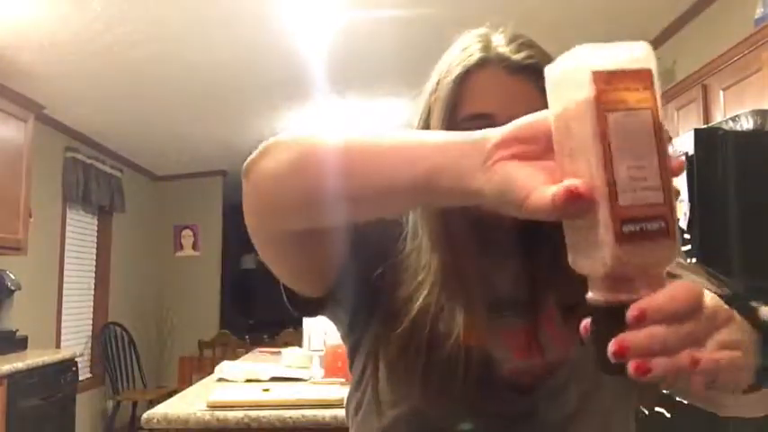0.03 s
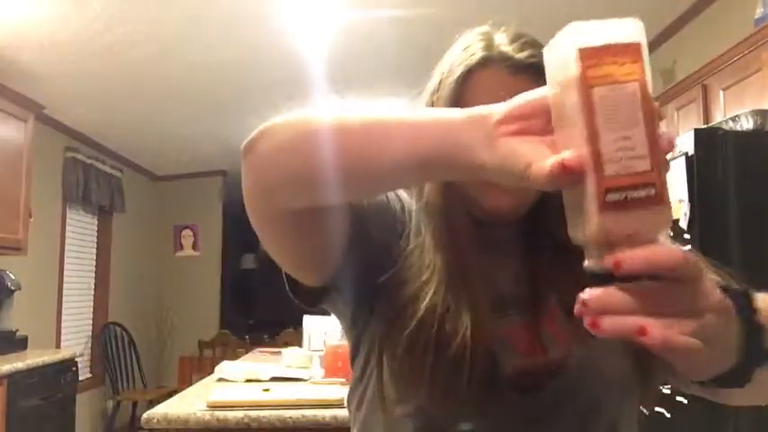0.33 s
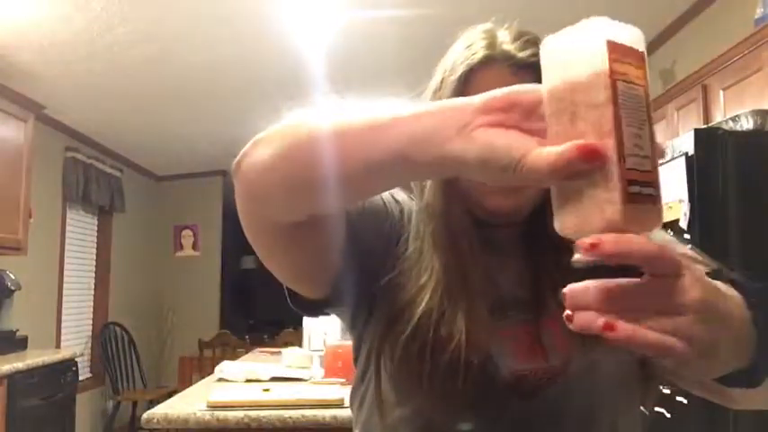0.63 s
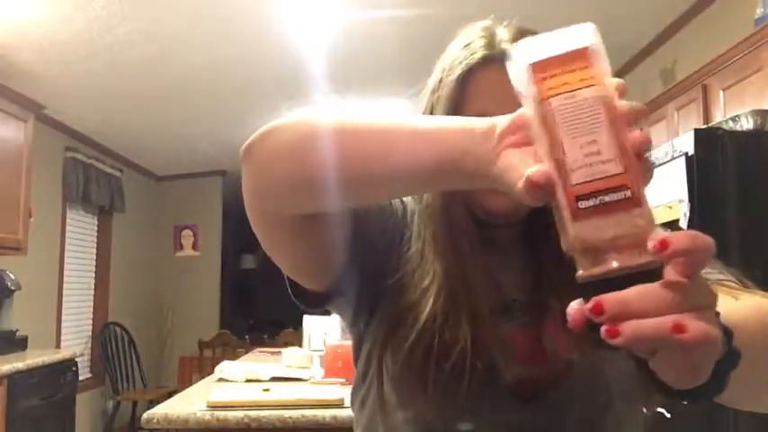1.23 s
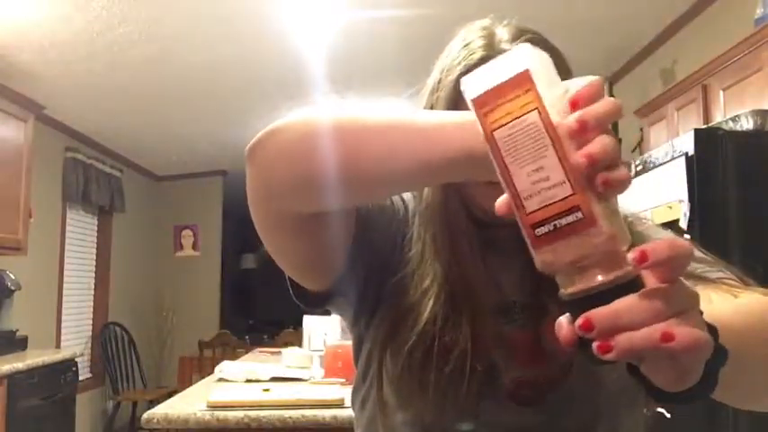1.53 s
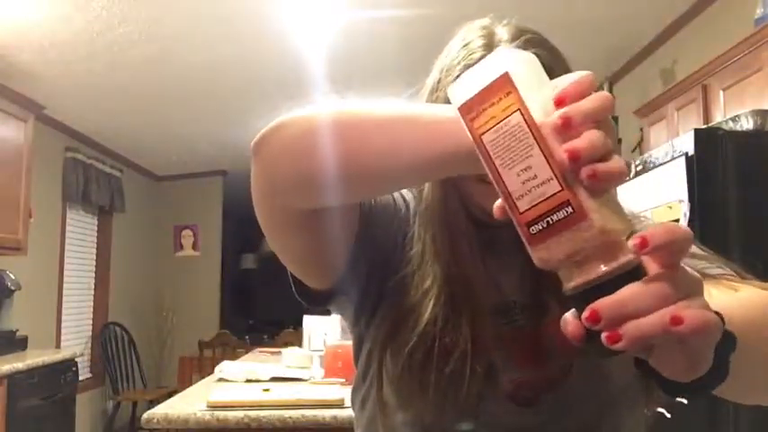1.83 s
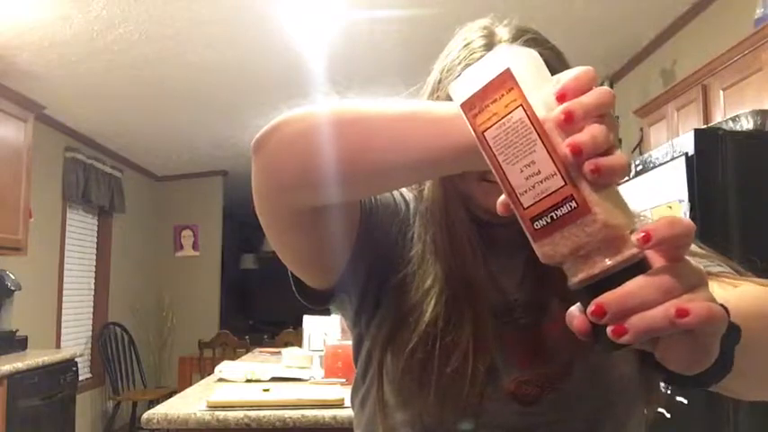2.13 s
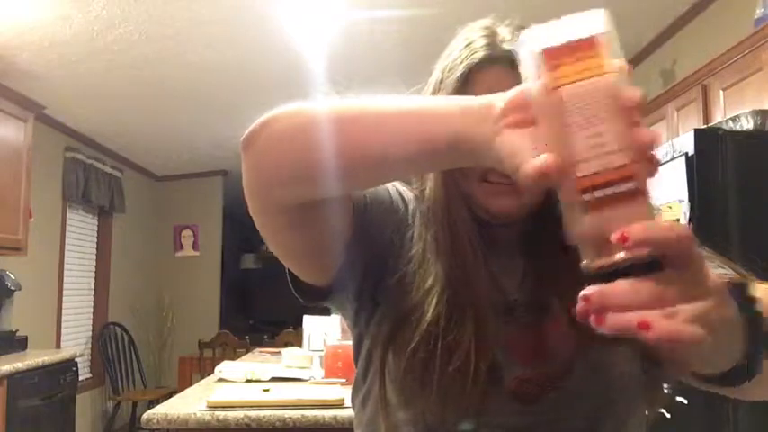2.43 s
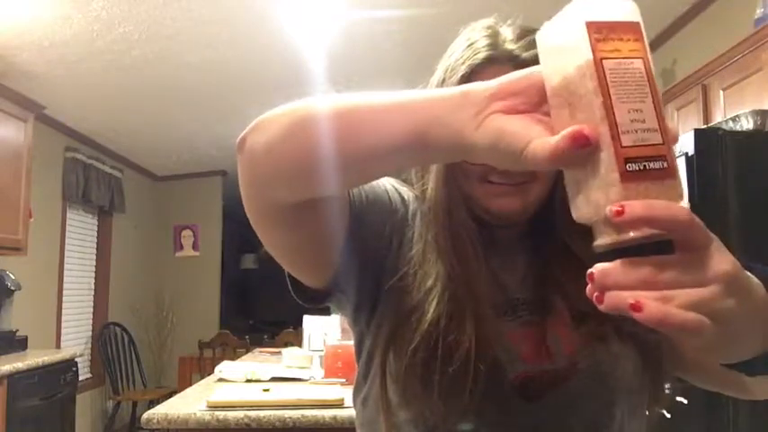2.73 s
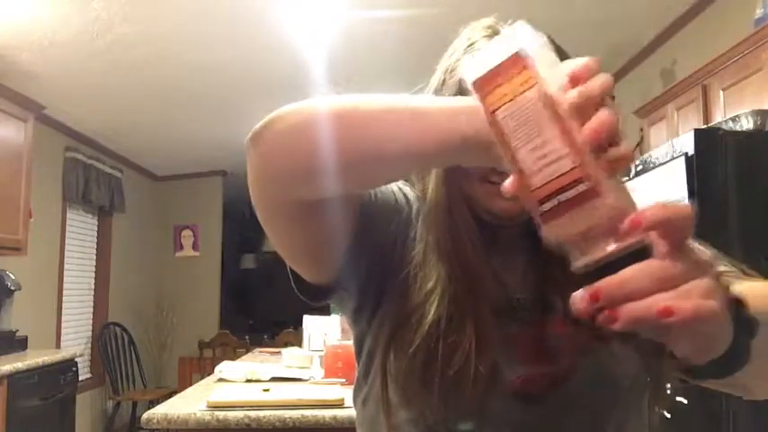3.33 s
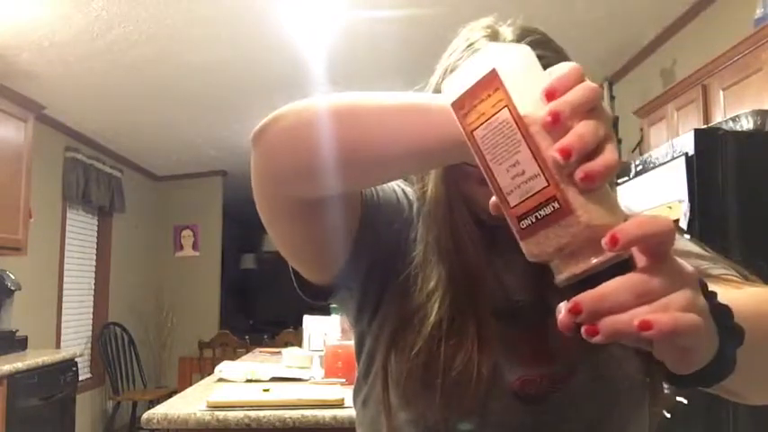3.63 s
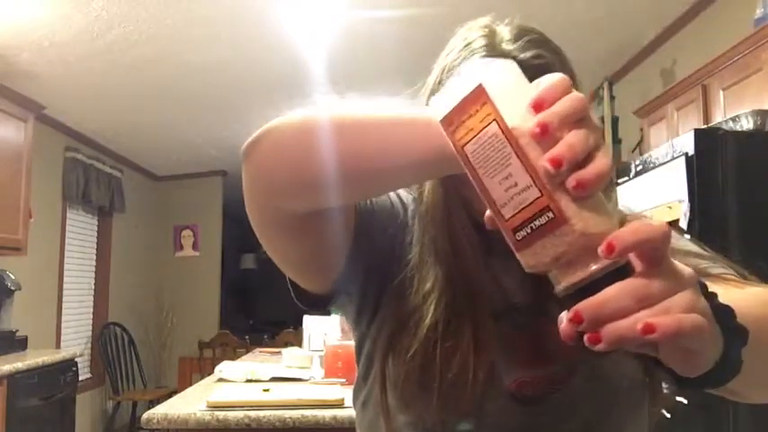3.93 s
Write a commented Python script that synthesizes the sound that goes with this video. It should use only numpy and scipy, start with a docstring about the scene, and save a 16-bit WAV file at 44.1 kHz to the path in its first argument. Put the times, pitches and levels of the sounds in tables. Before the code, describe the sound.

Coarse salt slides and knocks inside a plastic jar jerked by hand. Faint ticks lead to a few short rattles, a lull, then the loudest burst near the end. It sounds close, in a quiet kitchen with a humming refrigerator.

```python
"""Coarse salt surges and knocks in a plastic jar held upside down, gripped and jerked in a quiet kitchen.
Impacts of the salt excite the jar's damped modes; sliding, scraping and trickling are showers of tiny
random collisions. Hard lumps clack, stray crystals ping, the stressed plastic ticks under the fingers
and the palms bump it softly. Near surfaces echo, the room reverberates and a refrigerator hums behind."""
import sys
import numpy as np
from scipy import signal
from scipy.fft import rfft, irfft
from scipy.io import wavfile

SR = 44100
rng = np.random.default_rng(int(sys.argv[2]) if len(sys.argv) > 2 else 0)


def wrap_up_sound(samples):
    """Save the sound to the file named by the first command line argument, as 16-bit audio."""
    columns = np.atleast_2d(samples).T
    # keep every value between -1 and 1, then stretch to whole-number steps
    tamed = np.clip(columns, -1, 1)
    steps = np.round(tamed * 32767).astype(np.int16)
    wavfile.write(sys.argv[1], SR, steps)


N = 176400
T = np.arange(N) / SR
HIT_T = T[:SR // 8]  # time axis of one short event
IMPULSE = 1. * (HIT_T == 0)


def knocks():
    """Impact excitation: the mass of salt hits the wall, giving a crack and the jar's hollow ring."""
    # Impacts. Each row: start in seconds, level in dB, tilt in dB per octave, ring gain in dB.
    impacts = [(0.262, -64, -1, -8), (1.0752, -36.5, 1.5, -5), (1.0763, -42, -6, 6), (1.0925, -55, 2, -12),
               (1.2945, -41, 0.5, -9), (1.2985, -45, 4, -19), (1.3055, -33, 3, -5), (1.4562, -53, -0.5, 9),
               (2.4632, -40, 2, -7), (2.603, -43, 0.5, -6), (3.2995, -31.5, 4.5, -4),
               (3.3188, -32, -1.5, -7), (3.3294, -35, -1.5, -6), (3.3443, -55, 4, -11),
               (3.3548, -31, 0, -2.5), (3.3602, -40.5, 4, 1.5), (3.4324, -22, 0, -2.5),
               (3.4354, -30, 3, -8)]
    # Spectrum of the crack. Each row: frequency in Hz, relative level in dB.
    crack_spectrum = [(50, -36), (130, 3), (260, 1.5), (380, -13), (600, 10), (2000, 3), (5000, -2),
                      (8500, -12), (11000, -19), (16000, -17)]
    out = np.zeros(N)
    for start, db, tilt_db, ring_db in impacts:
        crack = unit_attack(colour(snap(decay_s=.004, edge=7.4), crack_spectrum, tilt_db))
        body = unit_attack(jar(IMPULSE, tilt_db, scatter_db=1.5))
        add(out, start, from_db(db) * (from_db(-2.5) * crack + from_db(ring_db) * body))
    return out


def slides():
    """Granular friction: salt surges along the wall in a shower of collisions that also rings the jar."""
    # Surges. Each row: start in seconds, length in seconds, level in dB, tilt in dB per octave.
    surges = [(0.286, 0.054, -57, -0.5), (0.363, .05, -61, 1.5), (0.416, .04, -56.5, 1),
              (0.465, 0.078, -51.5, 0), (0.766, 0.014, -52.5, 2), (0.877, 0.075, -64, 8),
              (1.063, 0.05, -41, 2), (1.117, 0.021, -51, -1), (1.293, 0.036, -43, 0),
              (1.445, 0.04, -48.5, 1.5), (1.532, 0.041, -48.5, 1), (2.431, 0.042, -60, 2.5),
              (2.456, 0.032, -46, -2), (2.486, 0.05, -52.5, 0.5), (2.682, 0.092, -63.5, 1),
              (3.252, 0.071, -52.5, 1), (3.286, 0.085, -38, -0.3), (3.374, 0.049, -50.5, 0.5),
              (3.43, 0.0087, -36, 3), (3.46, 0.021, -47.5, 2.5)]
    # Spectrum of sliding salt. Each row: frequency in Hz, relative level in dB.
    spectrum = [(60, -16), (160, -13.5), (390, -6.5), (520, -1.5), (670, 4.5), (780, -4.5), (950, 6),
                (1400, -0.5), (2400, -1), (4200, -1), (6500, -8.5), (8500, -15.5), (16000, -23.5)]
    full_surge_db = -39.5
    out, t = np.zeros(N), T[:SR // 4]
    for start, length, db, tilt_db in surges:
        per_s = 3000 * from_db(0.43 * (db - full_surge_db))  # gentler surges move fewer grains
        shower = crunch(len(t), per_s, spread_db=3.0)
        rush = unit_rms(colour(shower, spectrum, tilt_db))
        body = from_db(-20) * unit_rms(jar(shower, tilt_db, scatter_db=3))
        envelope = held(t, length, attack_s=0.0066, release_s=0.0079)
        add(out, start, from_db(db) * envelope * unit_rms(rush + body))
    return out


def jar(force, tilt_db, scatter_db):
    """Modal superposition: the jar's resonances add with alternating signs and random strengths."""
    # Modes of the filled jar. Each row: frequency in Hz, relative level in dB, 60 dB decay in seconds.
    modes = [(450, -9.5, 0.058), (545, -4, 0.051), (681, 3.5, 0.045), (840, 0, 0.022), (964, -1.5, 0.042),
             (1200, -3.5, 0.032), (1357, -1.5, 0.042), (1920, -23, 0.018), (2300, -3, 0.012),
             (2790, -1.5, 0.03), (3980, -14.5, 0.0094), (4100, 4, 0.027), (4390, -6, 0.054),
             (5090, -3, 0.027), (6990, -11, 0.023)]
    out = 0
    for k, (hz, db, t60) in enumerate(modes):
        strength = from_db(db + tilt_db * octaves(hz) + scatter_db * rng.standard_normal())
        out += (-1) ** k * strength * ring(force, hz, t60)
    return out


def lumps():
    """Heavily damped vibration: a hard lump strikes the wall with a short two-toned clack."""
    # Lump impacts. Each row: start in seconds, level in dB, lower frequency in Hz.
    clacks = [(2.4636, -38.5, 1960), (3.3102, -37.5, 1280), (3.3198, -34.5, 1570), (3.3296, -30.5, 1860),
              (3.3307, -35, 4050), (3.3547, -31, 1840), (3.362, -39, 2060)]
    out, t60 = np.zeros(N), 0.0076
    for start, db, hz in clacks:
        clack = ring(IMPULSE, hz, t60) - from_db(-7) * ring(IMPULSE, hz * 1.29, t60)
        add(out, start, from_db(db) * unit_attack(clack))
    return out


def scrapes():
    """Forced resonance: grains grind on one patch of wall, which sings in a narrow band."""
    # Scrapes. Each row: start in seconds, length in seconds, level in dB, band centre in Hz.
    patches = [(0.168, 0.042, -67, 790), (1.077, 0.0083, -42, 613), (1.096, 0.017, -44, 902),
               (1.292, .008, -42.5, 4200), (1.305, 0.0074, -36.5, 3930), (1.306, 0.023, -48.5, 5900),
               (1.323, 0.012, -46, 930), (2.479, 0.013, -53.5, 700), (2.68, 0.011, -52, 4170),
               (2.72, 0.077, -69, 3930), (3.537, 0.037, -64, 6000)]
    out = np.zeros(N)
    for start, length, db, hz in patches:
        envelope = held(HIT_T, length, attack_s=0.0038, release_s=0.0034)
        grinding = grains(len(HIT_T), per_s=3000, spread_db=-1)
        rasp = envelope * band_around(grinding, hz, width=0.079)
        envelope_rms = np.sqrt(np.mean(envelope ** 2))
        add(out, start, from_db(db) * unit_rms(rasp) * envelope_rms)
    return out


def ticks():
    """Release of elastic stress: the gripped plastic lets go with a bright snap and one short ring."""
    # Ticks. Each row: start in seconds, relative level in dB, ring in Hz, tilt in dB per octave.
    releases = [(0.244, -62, 7040, 4), (0.262, -46.5, 4900, 0), (0.349, -57, 6000, 7),
                (.419, -54.5, 4130, -0.5), (0.754, -61.5, 5870, 2), (0.7724, -48, 5000, -4),
                (0.871, -49.5, 3280, -5.5), (0.88, -48, 3660, -2.5), (0.931, -63, 6600, -5),
                (1.048, -45.5, 4000, 1.5), (1.0913, -48, 9920, -6), (1.2826, -55, 4600, 2),
                (1.4417, -41.5, 5760, 3.5), (1.4563, -44.5, 6150, -2.5), (1.472, -56, 5900, 4),
                (1.514, -57, 11200, 3), (1.6372, -47, 6200, 1.5), (1.643, -52.5, 6200, -2.5),
                (1.7318, -49, 5730, 2), (1.742, -56, 4800, -1.5), (2.5676, -43, 11500, 3.5),
                (2.572, -49.5, 12600, -4.5), (2.6694, -46.5, 3350, -1.5), (2.681, -47.5, 4200, -4.5),
                (2.9743, -66, 4340, -6), (3.274, -57, 6500, 3), (3.344, -47, 5230, 2),
                (3.3605, -50, 12900, 21)]
    # Spectrum of the snap. Each row: frequency in Hz, relative level in dB.
    spectrum = [(200, -21.5), (900, -9.5), (1800, -7), (3300, -2.5), (6500, 0), (8500, -7.5), (16000, -12)]
    out = np.zeros(N)
    for start, db, hz, tilt_db in releases:
        burst = unit_attack(colour(snap(decay_s=.0032, edge=1.6), spectrum, tilt_db))
        ringing = from_db(-8) * chink(hz, width=0.17, decay_s=0.011)
        add(out, start, from_db(db + 1.5) * (burst + ringing))
    return out


def pings():
    """Free vibration: single crystals drop and ring, each with a chink and a decaying tone."""
    # Drops. Each row: start in seconds, level in dB, frequency in Hz, the tone's 60 dB decay in seconds.
    drops = [(.6056, -69, 7350, 0.015), (0.661, -55.5, 4560, 0.027), (.674, -61.5, 6000, .02),
             (0.703, -67, 7300, .02), (1.859, -59, 6000, 0.017), (2.426, -67, 4300, .02),
             (2.918, -69.5, 4430, .02), (2.971, -60, 3600, 0.15), (3.242, -60.5, 4120, 0.018),
             (3.6465, -62.5, 5950, 0.013), (3.685, -65, 5200, 0.027), (3.765, -65.5, 3130, 0.032)]
    out = np.zeros(N)
    for start, db, hz, t60 in drops:
        tone = from_db(-2) * unit_attack(ring(IMPULSE, hz, t60))
        add(out, start, from_db(db) * (chink(hz, width=0.14, decay_s=0.0059) + tone))
    return out


def bumps():
    """Soft contact excites only low frequencies: a palm's push swells and dies as a dull scuff."""
    # Pushes of the palms. Each row: start in seconds, level in dB, band centre in Hz.
    pushes = [(1.087, -60, 126), (1.306, -54, 145), (1.544, -51, 161), (1.576, -56, 144),
              (3.355, -49.5, 192), (3.436, -50.5, 121)]
    rise_s = 0.0096
    out, age = np.zeros(N), HIT_T / rise_s
    for start, db, hz in pushes:
        scuff = unit_rms(band_around(rng.standard_normal(len(HIT_T)), hz, width=0.26))
        add(out, start, from_db(db) * age * np.exp(1 - age) * scuff)
    return out


def trickle():
    """Shot noise: fine grains run in a swelling and ebbing stream, with coarser scratches among them."""
    # Strength of the stream. Each row: time in seconds, relative level in dB.
    flow = [(0, -67), (.23, -71.5), (.29, -67.5), (.52, -68.5), (.62, -70.5), (.76, -66), (.94, -70.5),
            (1.02, -69), (1.36, -70.5), (1.5, -70), (1.72, -71), (1.96, -77.5), (2.4, -77), (2.6, -64),
            (2.85, -75.5), (3.22, -79), (3.5, -62.5), (3.72, -78), (4, -77)]
    # Spectrum of the fine grains. Each row: frequency in Hz, relative level in dB.
    fine_spectrum = [(500, -6), (2000, 2), (4500, -1), (7000, -8.5), (9000, -13.5), (16000, -17.5)]
    # Spectrum of the scratches. Each row: frequency in Hz, relative level in dB.
    scratch_spectrum = [(500, 18), (2000, -5), (3800, 9), (7000, 7.5), (9000, 10), (11500, 3), (16000, 7)]
    fine = unit_rms(colour(grains(N, per_s=3000, spread_db=-0.5), fine_spectrum))
    coarse = unit_rms(colour(crunch(N, per_s=90, spread_db=-1.0), scratch_spectrum))
    envelope = from_db(np.interp(T, *np.transpose(flow)))
    return envelope * (from_db(2) * fine + from_db(-9) * coarse)


def echoes(x):
    """Early reflection: table, ceiling and cupboards return delayed, slightly smeared copies."""
    # Reflections. Each row: delay in seconds, gain in dB, lowest reflected frequency in Hz.
    reflections = [(.0068, -16.5, 100), (.0115, -17.5, 100), (0.024, -20.5, 900), (.0395, -22, 1500)]
    response = np.zeros(N)
    for delay, db, low_hz in reflections:
        smear = band(snap(decay_s=0.00081, edge=3), low_hz, 12000)
        add(response, delay, from_db(db) * unit_energy(smear))
    return signal.fftconvolve(x, response[:len(HIT_T)])[:N]


def kitchen(x):
    """Reverberation: a diffuse field builds up quickly and decays exponentially, band by band."""
    # Reverberation times. Each row: frequency in Hz, 60 dB decay in seconds.
    decay_times = [(100, 0.22), (700, 0.29), (3500, 0.47), (8000, 0.35), (16000, 0.44)]
    # Spectrum of the reverberation. Each row: frequency in Hz, relative level in dB.
    spectrum = [(100, -4), (680, 0), (1400, 0), (4000, -4), (8000, -1), (16000, -10.5)]
    t, edges_hz = T[:SR * 2 // 3], np.geomspace(70, 18000, 9)
    tail, build_s = np.zeros(len(t)), 0.011
    for low, high in zip(edges_hz, edges_hz[1:]):
        t60 = at_hz(decay_times, np.sqrt(low * high))
        tail += band(rng.standard_normal(len(t)), low, high) * from_db(-60 * t / t60)
    tail *= 1 - np.exp(-(t / build_s) ** 2)
    return from_db(-12.5) * signal.fftconvolve(x, colour(unit_energy(tail), spectrum))[:N]


def refrigerator():
    """A line spectrum: the hum is a sum of tones, each wavering slightly in level and phase."""
    # Tones of the hum. Each row: frequency in Hz, rms level in dB.
    tones = [(58.5, -74), (119, -72.5), (209, -70), (235, -76), (294.5, -63.5), (353.5, -66.5),
             (4770, -88.5)]
    waver_db, wander_rad = 1, 0.13
    hum = np.zeros(N)
    for hz, db in tones:
        amplitude = from_db(db + waver_db * drift(per_s=4.53)) * np.sqrt(2)
        hum += amplitude * np.sin(2 * np.pi * hz * T + wander_rad * drift(per_s=6.2))
    return hum


def room_air():
    """Stationary broadband noise: the room's faint air, strongest in the bass."""
    # Spectrum of the air noise. Each row: frequency in Hz, relative level in dB.
    spectrum = [(25, -26.5), (42, -8.5), (56, -6.5), (85, -13), (120, -10.5), (145, -11), (190, -5),
                (260, -10), (320, -4.5), (390, -9), (470, -13.5), (900, -18.5), (1500, -24), (2200, -25.5),
                (3000, -42), (4700, -39.5), (5400, -38.5), (7200, -34.5), (8200, -56), (10500, -50.5),
                (16000, -44)]
    return from_db(-61.5) * unit_rms(colour(rng.standard_normal(N), spectrum))


def grains(n, per_s, spread_db):
    """A Poisson process: independent clicks of uneven size and random sign."""
    sizes = from_db(spread_db * np.minimum(rng.exponential(1, n), 4))
    return sizes * rng.choice([-1, 1], n) * (rng.random(n) < per_s / SR)


def crunch(n, per_s, spread_db):
    """Incoherent addition: grains that sound in one band each and broadband clicks share the power."""
    edges_hz, pitched_share = np.geomspace(60, 17000, 13), 0.65
    pitched = sum(band(grains(n, per_s / 2, spread_db), low, high)
                  for low, high in zip(edges_hz, edges_hz[1:]))
    clicks = grains(n, per_s, spread_db)
    return np.sqrt(pitched_share) * unit_rms(pitched) + np.sqrt(1 - pitched_share) * unit_rms(clicks)


def snap(decay_s, edge):
    """A transient: an impulse of height edge, then exponentially decaying noise."""
    burst = rng.standard_normal(len(HIT_T)) * np.exp(-HIT_T / decay_s)
    burst[0] = edge
    return burst


def chink(hz, width, decay_s):
    """A transient confined to a narrow band is heard as a short ring."""
    return unit_attack(band_around(snap(decay_s, edge=3.6), hz, width))


def ring(x, hz, t60):
    """A damped oscillator: a unit impulse starts a decaying sine of height 1."""
    radius, angle = from_db(-60 / (t60 * SR)), 2 * np.pi * hz / SR
    return signal.lfilter([0, np.sin(angle)], [1, -2 * radius * np.cos(angle), radius ** 2], x + 1e-18)


def held(t, length, attack_s, release_s):
    """An envelope: linear attack, hold until length, exponential release."""
    return np.minimum(t / attack_s, 1) * np.exp(-np.maximum(t - length, 0) / release_s)


def drift(per_s):
    """Slow modulation: straight lines join random values of spread 1."""
    knots = rng.standard_normal(200)
    return np.interp(T * per_s, np.arange(len(knots)), knots)


def colour(x, spectrum, tilt_db=0, size=4096):
    """A minimum-phase filter with the given spectrum and tilt per octave."""
    hz = np.maximum(np.arange(size // 2 + 1) * SR / size, 1)
    gain = from_db(at_hz(spectrum, hz) + tilt_db * octaves(hz))
    cepstrum = irfft(np.log(gain))
    cepstrum[1:size // 2] *= 2  # folding onto positive time makes the filter causal
    cepstrum[size // 2 + 1:] = 0
    response = irfft(np.exp(rfft(cepstrum)))
    return signal.fftconvolve(x, response)[:len(x)]


def band(x, low, high):
    """Band-pass between two frequencies in Hz."""
    sections = signal.butter(2, [low, min(high, SR / 2 - 10)], "band", fs=SR, output="sos")
    return signal.sosfilt(sections, x)


def band_around(x, hz, width):
    """Band-pass reaching a ratio of 1 + width either side of hz."""
    return band(x, hz / (1 + width), hz * (1 + width))


def octaves(hz):
    """Octaves above the middle of the jar's range, constant in the bass."""
    return np.log2(np.maximum(hz, 400) / 1500)


def at_hz(points, hz):
    """Interpolate a table on a log-frequency axis."""
    frequencies, values = np.transpose(points)
    return np.interp(np.log(hz), np.log(frequencies), values)


def from_db(db):
    """Decibels to amplitude gain."""
    return 10 ** (np.asarray(db) / 20)


def unit_rms(x):
    """Scale to rms 1."""
    return x / np.sqrt(np.mean(x ** 2) + 1e-20)


def unit_attack(x):
    """Scale so that the first 6 ms have rms 1."""
    return x / np.sqrt(np.mean(x[:264] ** 2) + 1e-20)


def unit_energy(x):
    """Scale so that the squares sum to 1."""
    return x / np.sqrt(np.sum(x ** 2))


def add(out, start_s, x):
    """Mix x into out from start_s on."""
    i = int(start_s * SR)
    out[i:i + len(x)] += x[:N - i]


def scene():
    """Superposition: the jar's direct sound, its reflections and the kitchen's background, in mono."""
    direct = knocks() + lumps() + bumps() + ticks() + pings() + slides() + scrapes() + trickle()
    low_cut_hz = 79  # deep bass is cut from the direct sound
    direct = signal.sosfilt(signal.butter(2, low_cut_hz, "high", fs=SR, output="sos"), direct)
    return (direct + echoes(direct) + kitchen(direct) + refrigerator() + room_air())[None]


def record(dry):
    """Band limiting: a steep low-pass removes the highest treble."""
    cutoff_hz = 16100
    return signal.sosfilt(signal.ellip(10, .2, 70, cutoff_hz, fs=SR, output="sos"), dry)


dry = scene()
out = record(dry)
wrap_up_sound(out)
```